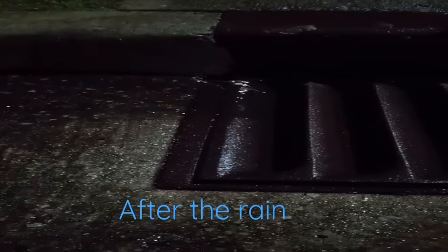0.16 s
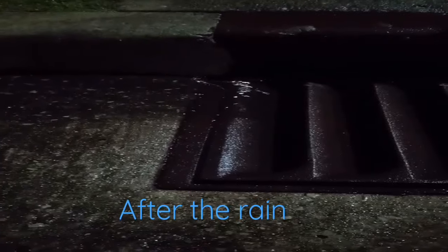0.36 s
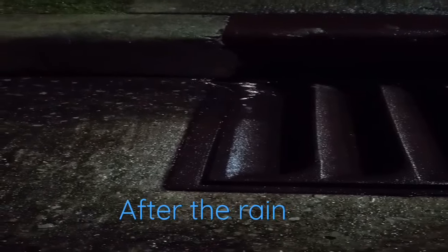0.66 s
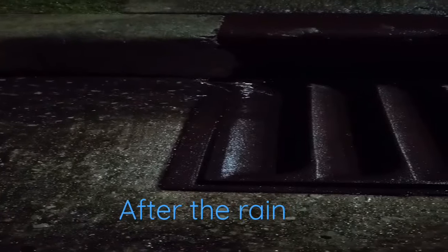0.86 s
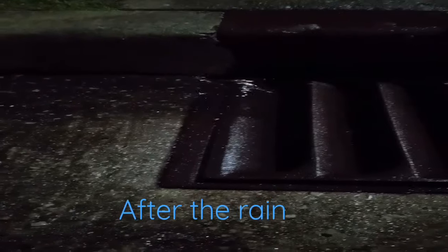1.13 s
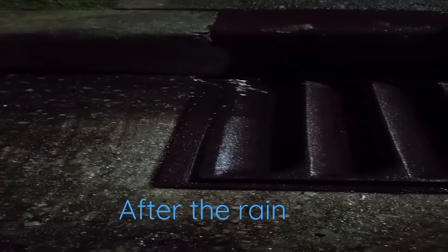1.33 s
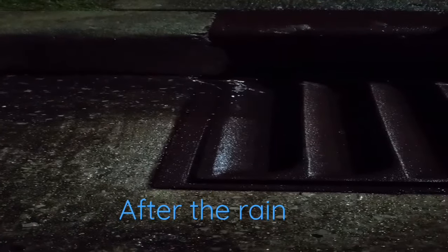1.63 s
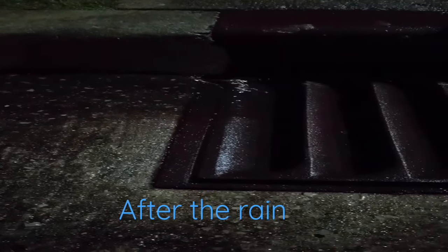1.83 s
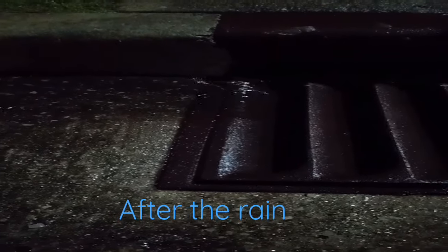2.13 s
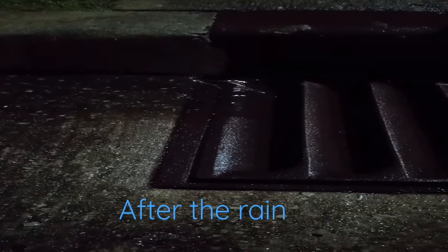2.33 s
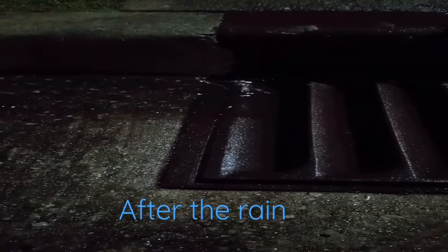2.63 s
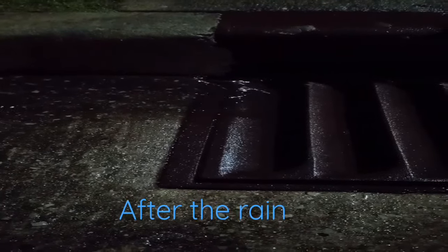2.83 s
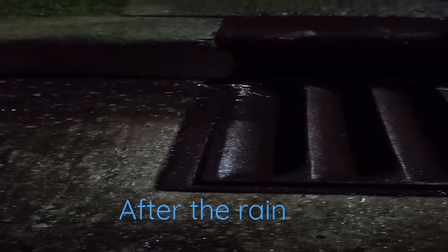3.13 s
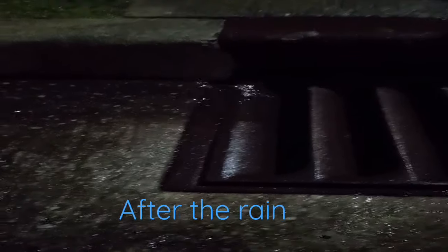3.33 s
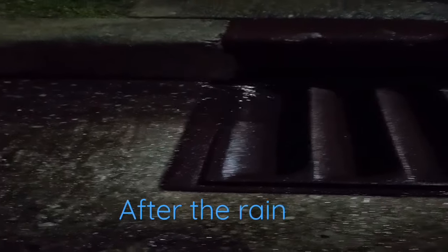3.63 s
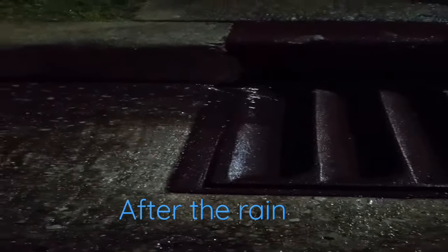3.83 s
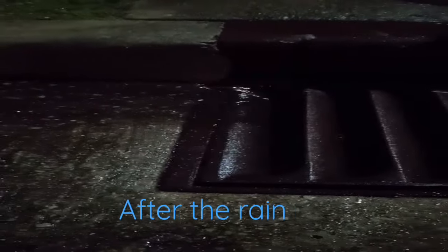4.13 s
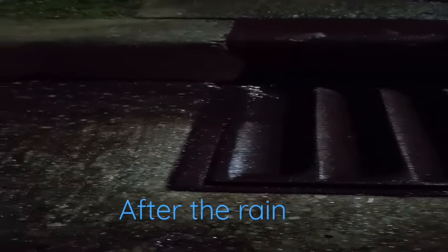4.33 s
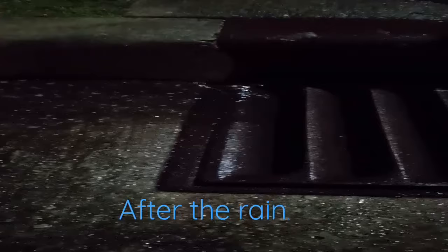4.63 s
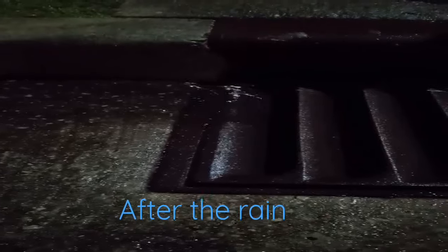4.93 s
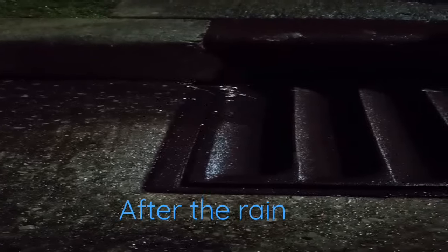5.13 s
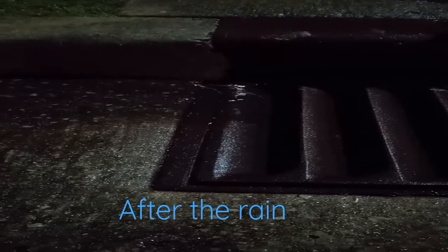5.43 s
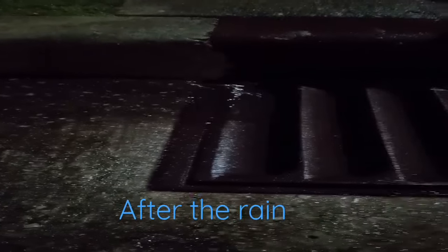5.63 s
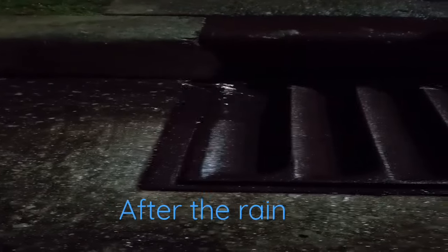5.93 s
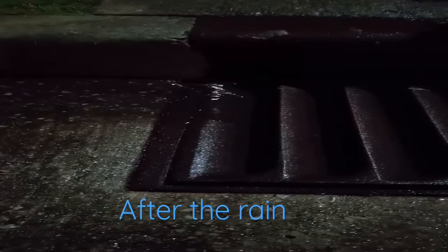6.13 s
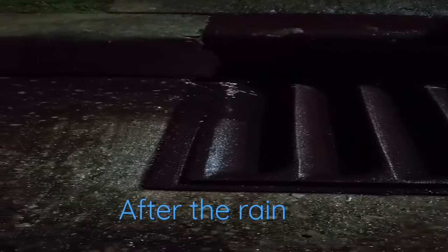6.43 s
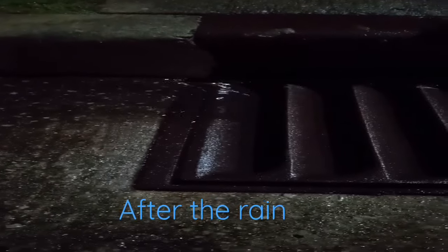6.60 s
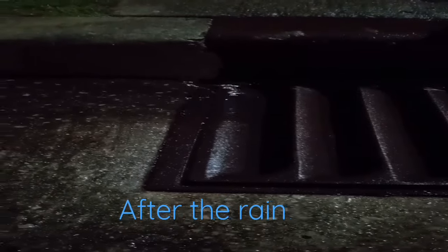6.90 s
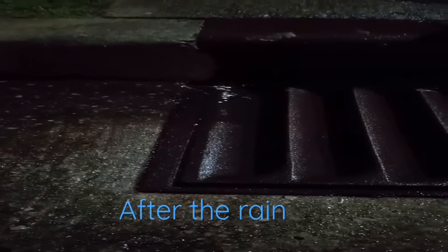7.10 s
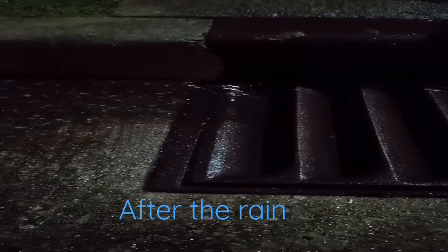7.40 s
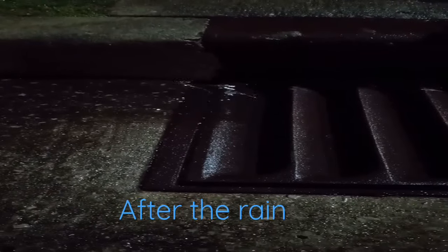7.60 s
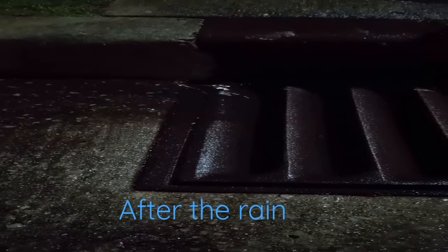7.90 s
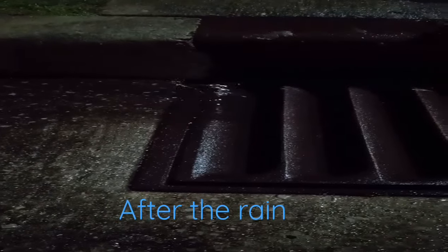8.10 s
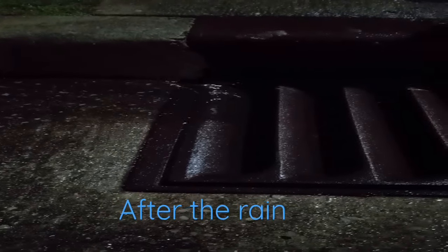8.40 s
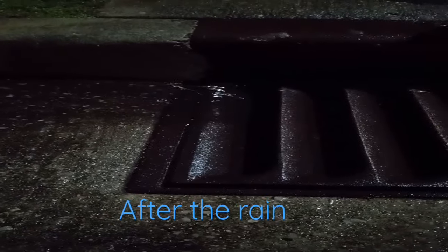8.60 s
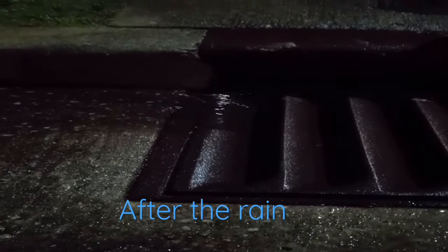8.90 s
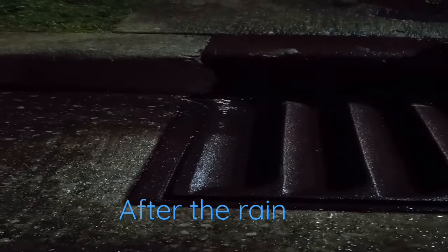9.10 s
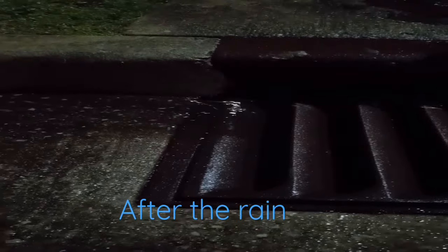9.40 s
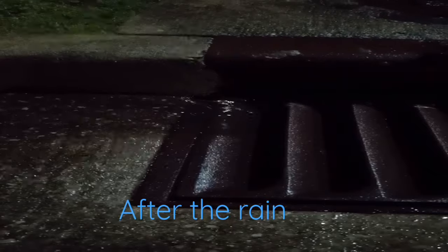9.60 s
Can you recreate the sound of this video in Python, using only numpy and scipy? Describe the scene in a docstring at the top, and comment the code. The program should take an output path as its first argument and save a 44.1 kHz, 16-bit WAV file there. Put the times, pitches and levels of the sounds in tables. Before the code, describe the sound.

Rainwater runs in a thin stream off a kerb and through an iron grate into a concrete drain. Bright ticking droplets, ringing bubbles and small plops overlap constantly, swelling in irregular gurgles. A few sharper smacks stand out. The short hollow echo of the shaft surrounds the water, with faint low rumble and hiss behind. Close stereo microphone; the brightest spray leans right.

```python
"""A thin stream runs off the kerb after rain, through an iron grate into a concrete storm drain.
It is a crowd of ringing bubbles and ticking spray that flickers in spurts and gurgles up in gushes.
Drops patter and plop into the pool below: filtered echo splashes with a bubble note, some with a sharp smack.
Distant town rumble, a wavering low boom of the shaft, traffic wash and fine hiss are shaped noise.
A few soft low bumps, mostly on the left, are decaying sines."""
import sys
import numpy as np
from scipy import signal
from scipy.fft import rfft, irfft, next_fast_len
from scipy.io import wavfile
from scipy.ndimage import uniform_filter1d

SR = 44100
rng = np.random.default_rng(int(sys.argv[2]) if len(sys.argv) > 2 else 0)


def to_wav(sig):
    """Store sig (one row per channel, or 1-D mono) as 16-bit WAV at the path in sys.argv[1].

    Samples outside -1..1 are clipped; the rate is SR.
    """
    pcm = np.clip(np.atleast_2d(sig), -1, 1) * 32767
    pcm = np.round(pcm).astype(np.int16)
    wavfile.write(sys.argv[1], SR, pcm.T)  # frames by channels


N = 429975
BUBBLE_RISE = 0.0384   # share by which a bubble's pitch rises while its ring falls to 1/e


def from_db(db):
    """Decibels to an amplitude factor."""
    return 10 ** (np.asarray(db) / 20)


def rms_one(x):
    """Scale to an rms of 1."""
    return x / np.sqrt(np.mean(x ** 2) + 1e-20)


def at_hz(points, hz):
    """Read a spectrum on a log-frequency axis."""
    f, value = np.transpose(points)
    return np.interp(np.log(np.maximum(hz, 1)), np.log(f), value)


def band(x, low, high):
    """Butterworth band-pass."""
    sos = signal.butter(2, [low, min(high, SR / 2 - 1000)], "band", fs=SR, output="sos")
    return signal.sosfilt(sos, x)


def resonate(x, hz, width):
    """One resonance, gain 1 on top, width in Hz."""
    r = np.exp(-np.pi * width / SR)
    zeros = np.array([1, 0, -1]) * (1 - r * r) / 2
    return signal.lfilter(zeros, [1, -2 * r * np.cos(2 * np.pi * hz / SR), r * r], x)


def pan(db):
    """Left and right gains of constant power for a left-right difference in dB."""
    gains = from_db(np.array([[.5], [-.5]]) * db)
    return gains / np.sqrt(np.mean(gains ** 2, axis=0))


def two_mics(pair, hz):
    """A common and an opposed signal become left and right, more alike in the bass."""
    # left-right likeness: f/Hz, correlation [-1 to 1]
    likeness = [(30, 0.83), (60, 1), (130, 0.91), (290, 0.88), (640, 0.48), (1410, 0.48), (2300, 0.59),
                (3100, 0), (15000, 0)]
    alike = np.clip(at_hz(likeness, hz), -.99, .99)
    return np.sqrt(1 + alike) * pair[0] + np.sqrt(1 - alike) * pair[1] * np.array([[1], [-1]])


def coloured(pair, spectrum):
    """Give a pair of signals a colour and a place; rms 1."""
    # stereo place, mostly to the right in the treble: f/Hz, left-right level/dB
    balance = [(30, 2), (60, -1.5), (110, 1), (700, 0.5), (1500, -3.5), (2500, 1.5), (3700, -0.5),
               (5300, -8), (7300, -9), (9500, -2.5), (11500, -12), (13000, -4), (15000, -16)]
    size = next_fast_len(N)
    hz = np.arange(size // 2 + 1) * SR / size
    placed = two_mics(rfft(pair, size), hz) * pan(at_hz(balance, hz))
    return rms_one(irfft(placed * from_db(at_hz(spectrum, hz)), size)[:, :N])


def drift(corner_hz):
    """Slow chance with spread 1: noise through a two-pole low-pass, drawn every 100 samples."""
    r = np.exp(-200 * np.pi * corner_hz / SR)
    slow = signal.lfilter([1], [1, -2 * r, r * r], rng.standard_normal(N // 100 + 1002))[1000:]
    return np.interp(np.arange(N) / 100, np.arange(len(slow)), rms_one(slow - slow.mean()))


def echoes(t60, direct_db, build_s):
    """One impact in the shaft: the direct path, then single wall reflections that thicken and die away."""
    first_per_s, thicken_s = 800, .014
    t = np.arange(SR // 5) / SR
    chance = np.minimum(first_per_s * (1 + t / thicken_s) ** 2 / SR, 1)
    hits = rng.random((2, len(t))) < chance
    walls = hits * rng.choice([-1, 1], (2, len(t))) / np.sqrt(chance)
    walls = walls * from_db(-60 * t / t60) * (1 - np.exp(-t / build_s))
    walls /= np.sqrt(np.sum(walls ** 2, axis=1, keepdims=True))
    walls[0, 0] += from_db(direct_db + 3)   # the direct path is in the common signal only
    return walls


def bubble(hz, q):
    """A trapped bubble rings and rises in pitch as it nears the surface; energy 1."""
    decay_s = q / (np.pi * hz)
    age = np.arange(int(6 * decay_s * SR) + 2) / SR / decay_s
    ring = np.exp(-age) * np.sin(2 * q * age * (1 + BUBBLE_RISE * age / 2))
    return ring / np.sqrt(np.sum(ring ** 2))


def bubbles(spectrum, range_hz, per_s, spread_db, q, t60, direct_db, build_s, count=14):
    """Separate bubbles, each of its own pitch and strength, ring at a number of spots in the shaft."""
    out, (low, high) = 0, range_hz
    for _ in range(count):
        spot = np.zeros(N + SR)
        for when, pitch, size, damping in rng.random((int(per_s * N / SR / count), 4)):
            hz = low * (high / low) ** pitch
            ring = bubble(hz, q * 2 ** (2 * damping - 1))
            strength = np.sqrt(hz) * from_db(spread_db * min(-np.log(size), 2.5))
            at = int(when * N)
            spot[at:at + len(ring)] += ring * strength
        out = out + signal.oaconvolve(spot[None, :N], echoes(t60, direct_db, build_s), axes=1)[:, :N]
    return coloured(out, spectrum)


def gush_lift(hz):
    """Lift in dB that the gushes give to bubbles of one pitch."""
    # the stream gathers and lets go, stirring up large bubbles: t/s, bubble f/Hz, gurgle lift level/dB
    gushes = [(.47, 1300, 13.5), (.76, 1000, 10.5), (.93, 900, 3), (1.15, 1050, 8), (1.39, 1050, 13),
              (1.53, 1100, 5.5), (1.73, 1400, 7.5), (1.95, 1200, 5), (2.26, 1500, 12), (3.0, 1390, 12),
              (3.46, 1700, 8), (3.98, 1300, 10), (4.22, 1800, 3.5), (4.66, 1610, 11), (5.06, 1300, 7),
              (5.42, 1500, 13), (5.62, 1400, 8.5), (6.0, 1300, 7), (6.8, 1000, 6), (6.93, 1400, 10),
              (7.09, 1400, 12.5), (7.3, 1300, 3), (7.43, 1600, 8.5), (7.75, 1400, 9), (8.0, 1300, 8.5),
              (8.25, 1700, 7), (8.48, 1200, 3), (9.2, 1400, 2), (9.68, 1600, 8.5)]
    half_s, spread_octaves = 0.06, 1.3   # distances at which the lift in dB falls to 1/e
    t = np.arange(0, N, 100) / SR
    lift = 0
    for s, pitch, db in gushes:
        off_pitch = np.log2(hz / pitch) / spread_octaves
        lift = lift + db * np.exp(-((t - s) / half_s) ** 2 - off_pitch ** 2)
    return np.interp(np.arange(N) / SR, t, lift)


def gushing(gurgle):
    """Each size of bubble swells with the gushes near its pitch."""
    # centres of the bubble sizes, crossfaded between neighbours: f/Hz
    sizes_hz = (800, 1300, 2000, 3000)
    size = next_fast_len(N)
    spectrum, hz = rfft(gurgle, size), np.arange(size // 2 + 1) * SR / size
    out = 0
    for pitch, share in zip(sizes_hz, np.eye(len(sizes_hz))):
        part = irfft(spectrum * np.interp(hz, sizes_hz, share), size)[:, :N]
        out = out + from_db(gush_lift(pitch)) * part
    return out


def impacts(per_s, spread_db, count=20000):
    """Random clicks of uneven size."""
    when, chance, size, side = rng.random((count, 4)).T
    heard, clicks = chance < per_s * N / SR / count, np.zeros(N)
    strength = from_db(spread_db * np.minimum(-np.log(size), 3)) * np.sign(side - .5)
    clicks[(when[heard] * N).astype(int)] = strength[heard]
    return clicks


def fine_spray(per_s, spread_db, t60):
    """Tiny droplets of three sizes tick on wet iron and concrete, each with a short wash of reflections."""
    # colour of the spray: f/Hz, level/dB
    spray_colour = [(4000, 9.5), (7000, 6), (9000, 0.5), (11500, 5), (12300, 0), (13300, 1), (14000, -2),
                    (14800, 16), (16000, -1)]
    out, r = 0, from_db(-120 / (t60 * SR))   # per-sample decay of the energy
    # the smallest droplets are the crispest
    for low, high, direct_db in [(4000, 10000, -6), (9500, 13800, -1), (13300, 17000, 3)]:
        clicks = impacts(per_s, spread_db)
        energy = signal.lfilter([1 - r], [1, -r], clicks ** 2 + 1e-18)
        direct = np.array([np.roll(clicks, 12), clicks])   # the direct tick comes 12 samples later in the common signal than in the opposed one
        ticks = np.sqrt(energy) * rng.standard_normal((2, N)) + from_db(direct_db) * direct
        out = out + band(rms_one(ticks), low, high)
    return coloured(out, spray_colour)


def stream():
    """The falling stream: gurgle of large bubbles, patter of small ones, crackle of spray, all in spurts."""
    # colour of the large bubbles: f/Hz, level/dB
    gurgle_colour = [(450, 4), (800, -4.5), (1300, -4), (2000, 1), (2800, 6.5), (4000, -8)]
    # colour of the small bubbles: f/Hz, level/dB
    patter_colour = [(1500, -9.5), (2400, -8), (3200, 0), (4500, -5.5), (6200, 3), (7300, 0), (8500, -17),
                     (12000, -22)]
    spurt_hz, share = 15, 0.38   # flicker corner; share of its power common to all sizes
    spurts = drift(spurt_hz)
    large, small, fine = (np.sqrt(share) * spurts + np.sqrt(1 - share) * drift(spurt_hz) for _ in range(3))
    gurgle = bubbles(gurgle_colour, (650, 3100), per_s=120, spread_db=1.3, q=31.8, t60=0.2,
                     direct_db=-9, build_s=0.0041)
    patter = bubbles(patter_colour, (2400, 8000), per_s=170, spread_db=2.0, q=47, t60=0.25,
                     direct_db=-7.5, build_s=0.0032)
    spray = fine_spray(per_s=260, spread_db=4.0, t60=0.13)
    # level in dB, and how far it swings with a spurt
    trickle = from_db(-61 + 2.1 * large) * gushing(gurgle) + from_db(-48 + 1.5 * small) * patter
    return trickle, from_db(-44.5 + 1.42 * fine) * spray


def boom():
    """The shaft's lowest air mode: a wavering drone without long gaps, with smooth swells."""
    # swells of the boom: t/s, peak level/dB over which the steady drone adds in power
    swell_list = [(.3, -49), (.69, -50), (1.56, -48.5), (1.71, -52), (2.32, -47.5), (2.75, -51.5),
                  (3.32, -50), (4.29, -54), (4.78, -48.5), (4.89, -49), (5.97, -54), (7.27, -44),
                  (7.49, -44.5), (7.69, -50), (7.83, -46), (9.24, -42), (9.6, -51)]
    mode_hz, drone_db, half_s = 158.6, -60.5, 0.037   # half_s: a swell's amplitude is halved this far off
    t = np.arange(N) / SR
    drone = resonate(resonate(rng.standard_normal(N), mode_hz, 16), mode_hz, 30)
    # partly even out the wavering
    drone = rms_one(drone / (uniform_filter1d(drone ** 2, SR // 12) + 1e-12) ** .35)
    swells = sum((from_db(db) / (1 + ((t - s) / half_s) ** 2)) ** 2 for s, db in swell_list)
    return drone * np.sqrt(from_db(drone_db) ** 2 + swells)


def background():
    """Distant town rumble and traffic wash as drifting noise, the air modes of the shaft, steady fine hiss."""
    # course of the town rumble before its trim: t/s, level/dB
    town = [(0.0, -64), (0.16, -54), (0.32, -62), (0.38, -49), (0.46, -56.5), (0.97, -60.5), (1.95, -58.5),
            (2.15, -51.5), (2.17, -65), (2.36, -56), (3.12, -63), (3.17, -57), (3.56, -63.5), (3.83, -50.5),
            (3.94, -65), (5.02, -56), (5.05, -60), (6.0, -62), (6.03, -70), (6.11, -57.5), (6.65, -63),
            (6.71, -51), (6.87, -62.5), (7.55, -55), (7.76, -64), (7.79, -53.5), (7.98, -66), (8.04, -56.5),
            (8.17, -67), (8.36, -55), (8.99, -68), (9.04, -55), (9.12, -68), (9.2, -54), (9.29, -65),
            (9.4, -53), (9.5, -64), (9.61, -56), (9.67, -75), (9.75, -60)]
    # colour of the town rumble: f/Hz, level/dB
    rumble_colour = [(22, -29), (35, -32), (55, -12.5), (85, 4), (120, 0), (170, -5.5), (260, -15.5),
                     (400, -26)]
    # colour of the fine hiss: f/Hz, level/dB
    hiss_colour = [(2000, -37), (5000, -4.5), (9000, -7.5), (15000, -14)]
    # colour of the distant traffic wash: f/Hz, level/dB
    air_colour = [(120, -13.5), (220, -0.5), (350, -5), (600, -7), (1000, -15.5), (2000, -52), (5000, -56)]
    s, db = np.transpose(town)
    town_db = np.interp(np.arange(N) / SR, s, db) + 3.5
    # quick unevenness: swing in dB, corner in Hz
    rumble = from_db(town_db + 2.0 * drift(7.6)) * coloured(rng.standard_normal((2, N)), rumble_colour)
    hiss = from_db(-51) * coloured(rng.standard_normal((2, N)), hiss_colour)
    air = from_db(-62 + 2 * drift(20)) * coloured(rng.standard_normal((2, N)), air_colour)
    # higher air modes
    overtones = sum(resonate(rumble + air, hz, width=14.0) for hz in (202, 238.0, 278.0, 355))
    return rumble + boom() + air + hiss + from_db(-7.5) * overtones


def drops():
    """Each drop smacks the pool and traps a bubble that rings for a few cycles."""
    # drops that stand out of the stream:
    # t/s, bubble f/Hz, splash width [octaves], level/dB before trim, left-right level/dB
    drop_list = [(0.0171, 2200, 0.58, -39.5, -7), (0.017, 3450, 0.71, -37.5, -7),
                 (0.026, 2760, 0.33, -35, 3), (.109, 2230, .15, -57, 3), (.184, 1360, 0.23, -56.5, -5),
                 (0.214, 2530, 0.23, -53.5, -4), (0.298, 6150, 0.16, -45, -13),
                 (0.406, 6340, 0.3, -46, -10), (.409, 2250, 0.18, -52, -7), (.456, 1190, 0.56, -50, -2),
                 (0.523, 977, 0.27, -53.5, 0), (0.594, 5800, 0.91, -43, -7), (0.691, 5900, 0.36, -49, -8),
                 (.722, 817, 0.12, -60, -3), (.727, 5660, 0.81, -40, -13), (.876, 8000, 0.55, -38, -7),
                 (.893, 850, 0.21, -58.5, -1), (0.935, 2960, 0.59, -45, -5), (1.12, 6400, 0.55, -41, -9),
                 (1.124, 2230, .15, -50, -9), (1.138, 1154, 0.2, -50.5, -2), (1.176, 7500, .25, -45, -8),
                 (1.221, 5600, .5, -48, -8), (1.275, 1930, 0.2, -63, -1), (1.361, 2970, 0.2, -45.5, -4),
                 (1.395, 4750, 0.38, -39.5, -8), (1.407, 5100, 0.33, -40.5, -8),
                 (1.497, 5560, 0.32, -36.5, -8), (1.539, 5500, 0.46, -39.5, -8),
                 (1.607, 830, 0.4, -51.5, -2), (1.618, 4550, 1.5, -40.5, -5),
                 (1.715, 3020, 0.58, -41.5, -3), (1.807, 5230, 0.41, -41.5, -8),
                 (1.901, 1750, 0.41, -55.5, -4), (1.711, 2330, 0.21, -63, -2), (1.924, 5800, 0.32, -45, -9),
                 (2.117, 960, 0.49, -59.5, -4), (2.205, 2650, 0.36, -49, -1), (2.092, 4800, 0.22, -41, -10),
                 (2.087, 3170, 0.57, -45, 1), (2.212, 4800, 1.1, -39.5, -11), (2.225, 1120, 0.48, -59, 2),
                 (2.254, 1930, 0.63, -50, -3), (2.39, 1270, 0.13, -55, -4), (2.4637, 3300, 0.27, -33, -1),
                 (2.464, 4190, .15, -35.5, -4), (2.468, 5400, 0.18, -37.5, -10),
                 (2.496, 5360, 0.18, -47, -11), (2.586, 1760, 0.17, -56.5, -3), (2.644, 2040, .28, -60, -5),
                 (2.684, 3140, 0.63, -50, -2), (2.738, 5260, 0.73, -42, -13), (2.733, 826, 0.49, -60.5, 7),
                 (2.832, 950, 0.35, -60, -1), (2.858, 4930, 0.37, -38.5, -9), (2.888, 2200, .18, -54.5, -1),
                 (2.949, 3240, 0.51, -44.5, -4), (2.966, 2240, .2, -61, -4), (2.997, 2200, 1.3, -52, -3),
                 (3.035, 1220, 0.48, -60, -5), (3.073, 3200, 0.38, -47.5, 4), (3.174, 3660, 0.44, -41.5, 2),
                 (3.341, 1890, 0.26, -55.5, 1), (3.445, 2350, 0.25, -57, 0), (3.51, 3460, 0.71, -44, 0),
                 (3.544, 2040, 0.4, -54, 0), (3.543, 3670, 0.9, -41.5, -3), (3.61, 5030, 0.67, -39, -6),
                 (3.612, 1940, 0.23, -58, -3), (3.673, 1500, 0.5, -47.5, -1), (3.68, 1120, 0.26, -59, -3),
                 (3.736, 1450, 0.53, -51, -3), (3.75, 2050, 0.44, -50.5, -5), (3.774, 1490, 0.18, -62, -3),
                 (3.883, 5660, 0.4, -51, -7), (3.921, 1656, 0.16, -54, -4), (3.93, 2590, .2, -52, 1),
                 (3.943, 830, 0.47, -57.5, 2), (3.986, 1680, 0.13, -61, -3), (3.966, 5360, 0.75, -38, -9),
                 (3.985, 3730, 0.21, -44, -3), (4.003, 3820, 0.83, -39, -4), (4.075, 6070, 0.24, -41, -16),
                 (4.11, 5200, 2.2, -42, -9), (4.297, 6200, .3, -47, -12), (4.301, 2100, .2, -58, -4),
                 (4.309, 4830, 0.87, -41, -3), (4.642, 5400, 0.67, -38.5, -10),
                 (4.668, 1460, 0.29, -57, -4), (4.704, 1900, 0.37, -56, -8), (4.994, 1740, 0.31, -55, -2),
                 (5.054, 810, 0.14, -61, -3), (5.026, 4720, .15, -45, -7), (5.055, 2640, 0.63, -47, -6),
                 (5.062, 5140, 0.61, -38, -6), (5.256, 5300, .6, -43.5, -8), (5.34, 5970, .3, -45, -8),
                 (5.38, 5950, .2, -43.5, -8), (5.408, 4000, 0.7, -43.5, -4), (5.422, 1900, 0.12, -53.5, -7),
                 (5.437, 2560, .15, -59, -3), (5.564, 6230, 0.17, -37, -10), (5.57, 3300, .25, -45.5, -2),
                 (5.605, 1710, 0.68, -51, -5), (5.602, 2780, 0.17, -42, 1), (5.682, 4730, 0.13, -47, -6),
                 (5.789, 5500, 0.47, -39.5, -7), (5.79, 3500, 0.24, -52, 0), (5.933, 2920, 0.27, -47.5, 1),
                 (6.055, 5100, 1.2, -41.5, -4), (6.19, 830, 0.24, -65, 2), (6.293, 5950, 0.27, -44, -12),
                 (6.353, 5500, 0.77, -38.5, -6), (6.537, 3370, 0.72, -40.5, -2),
                 (6.632, 4570, 0.91, -39, -9), (6.748, 5500, .55, -41, -4), (6.771, 1080, 1.2, -56, 0),
                 (6.776, 2430, 1.2, -48, 1), (6.773, 5900, .5, -50, -8), (6.83, 2130, 0.33, -58, -1),
                 (6.915, 2570, .3, -54, -3), (6.925, 1410, 0.38, -59, -3), (6.9, 2040, 0.55, -53.5, -1),
                 (6.941, 1875, .15, -54, -4), (7.041, 2040, 0.94, -50, 0), (7.0855, 4740, 0.29, -35.5, -5),
                 (7.104, 1210, 0.75, -60, -4), (7.267, 1590, 0.82, -55, -3), (7.294, 6070, 0.46, -39, -10),
                 (7.425, 2100, 0.26, -61, -4), (7.488, 6400, 0.46, -36.5, -8),
                 (7.641, 6170, 0.19, -40, -14), (7.708, 6100, 0.39, -42, -11), (7.669, 1270, 1.2, -50, 0),
                 (7.729, 1420, 0.57, -60, 7), (7.829, 660, 0.38, -53.5, 0), (7.858, 527, 0.36, -59, -5),
                 (7.934, 2180, .15, -55, -10), (7.979, 2150, .18, -57, -10), (8.189, 1950, .5, -55.5, 1),
                 (8.19, 6500, 0.22, -38, -8), (8.252, 1740, 0.59, -53, -6), (8.25, 5630, 0.46, -38, -3),
                 (8.252, 3030, 0.47, -54, -7), (8.412, 824, 0.12, -58.5, 1), (8.455, 2970, 0.22, -48, 7),
                 (8.462, 4370, 0.17, -47, -5), (8.584, 2350, 0.22, -53, -1), (8.585, 2980, 0.27, -54, -4),
                 (8.339, 5700, 0.51, -43, -9), (8.45, 2390, 0.24, -51, 4), (8.449, 860, 1.7, -55, -5),
                 (8.462, 5000, 0.71, -40, -9), (8.511, 1330, 0.18, -52, -8), (8.58, 4040, 0.27, -43, -5),
                 (8.715, 3720, 1.8, -46, 0), (8.845, 820, 0.26, -66, -1), (8.855, 6200, .3, -43.5, -11),
                 (9.012, 3630, 0.17, -42, -3), (9.147, 1520, 0.74, -56.5, -2),
                 (9.233, 3660, 0.2, -44.5, -4), (9.245, 1200, 0.55, -55, -3), (9.44, 1650, 0.29, -58, 5),
                 (9.456, 4700, 0.42, -43, -14), (9.616, 4550, 1.6, -43, -12), (9.731, 1200, 1.1, -54, -4)]
    trim_db, smack_db, note_db, note_q = -9, -12, -2.5, 49   # smack and note are relative to the splash
    t60, direct_db, build_cycles = 0.17, -10.5, 6.1   # echo length in s, direct path over echo, echo swell
    out = np.zeros((2, N + SR))
    for s, hz, octaves, db, side_db in drop_list:
        heard = two_mics(echoes(t60, direct_db, build_s=build_cycles / hz), hz)
        half = 2 ** (max(octaves, .12) / 2)
        splash = band(heard, hz / half, hz * half)
        splash = rms_one(band(splash, hz / half / 1.05, hz * half * 2))
        smack = band(heard, hz * .85, hz * 1.8)
        smack = rms_one(band(smack, hz * .85, hz * 1.8))
        ring = bubble(hz * (1 - BUBBLE_RISE / 2), note_q)
        note = rms_one(signal.fftconvolve(splash, ring[None], axes=1)[:, :splash.shape[1]])
        # wide splashes ring less
        plop = rms_one(splash + from_db(smack_db) * smack + from_db(note_db) / half ** 4 * note)
        at = max(round(s * SR), 0)
        out[:, at:at + plop.shape[1]] += plop * from_db(db + trim_db) * pan(side_db)
    return out[:, :N]


def shaft(water):
    """Standing waves between the walls lift narrow bands, differently at each side, and hollow out others."""
    # standing waves at the left microphone: f/Hz, width [Hz], lift level/dB
    left_modes = [(816.5, 17.5, 12.5), (1112, 24, 9), (1166, 22, 10), (1245, 38, 11), (1380, 92, 7),
                  (1616, 19, 7.5), (1728, 18, 10.5), (1730, 37, 3.5), (1889, 31, 14.5), (2770, 22, 2.5),
                  (3050, 39, -13), (4040, 87, 7), (4670, 68, 9.5), (5820, 19, 14)]
    # standing waves at the right microphone: f/Hz, width [Hz], lift level/dB
    right_modes = [(807, 22, 8.5), (1072, 18, 7), (1148, 22, 7), (1420, 70, 6), (1726, 30, 6),
                   (1904, 28, 6), (2223, 110, 6), (2600, 120, 3), (2926, 45, 8), (3072, 50, 8.5),
                   (3337, 32, 4), (3468, 35, 4), (3620, 50, 4), (4102, 35, 4), (4220, 60, 5), (4320, 50, 4),
                   (4749, 55, 4), (4920, 45, 4), (5217, 80, 3), (6229, 45, 7)]
    # bands shared by both sides, mostly cancelling between the walls: f/Hz, width [Hz], lift level/dB
    hollows = [(1040, 120, 0), (1283, 48, -7), (1566, 28, -22), (2250, 86, 1.5), (2410, 110, -4),
               (4090, 110, -21.5)]
    sides = []
    for x, modes in zip(water, (left_modes, right_modes)):
        change = sum((from_db(db) - 1) * resonate(x, hz, width) for hz, width, db in modes + hollows)
        sides.append(x + change)
    return from_db(-0.5) * np.array(sides)


def smacks():
    """Drops on wet iron in the open: a few cycles that swell and die within milliseconds."""
    # sharp smacks: t/s, f/Hz at the peak, level/dB before trim and panning, left-right level/dB
    smack_list = [(.0175, 2470, -27.5, -2), (.877, 7900, -33, -9), (1.12, 6500, -33, -8),
                  (1.497, 5440, -34, -8), (2.4647, 3250, -21.5, 0), (2.479, 3350, -27, -3),
                  (2.4887, 3500, -31, -3), (3.967, 5400, -29, -8), (5.5626, 6200, -27, -8),
                  (6.748, 5500, -31, -6), (7.0862, 4640, -30.5, -6), (7.489, 5960, -27, -10),
                  (7.641, 6150, -27, -12), (8.19, 6460, -26, -8), (8.251, 5550, -33, -2),
                  (8.584, 4000, -34, -5)]
    peak_cycles, trim_db = 4.8, -1.2   # cycles until a smack peaks; overall trim
    out, t = np.zeros((2, N + SR)), np.arange(SR // 50) / SR
    for s, hz, db, side_db in smack_list:
        age, at = t * hz / peak_cycles, int(s * SR)
        tick = age * np.exp(1 - age) * np.sin(2 * np.pi * hz * t * (1 + BUBBLE_RISE * (age / 2 - 1)))
        pair = np.array([np.roll(tick, 1), tick])   # the right microphone is nearer
        out[:, at:at + len(t)] += pair * from_db(db + trim_db) * pan(side_db)
    return out[:, :N]


def bumps():
    """Soft low thuds, mostly on the left: sines with a soft onset and an exponential decay."""
    # thuds: t/s, f/Hz, t60 [s], level/dB before onset and panning
    bump_list = [(0.135, 70, 0.25, -41), (0.365, 62, 0.2, -32), (.435, 240, .12, -42.5),
                 (.13, 228, 0.18, -49)]
    out = np.zeros(N)
    for s, hz, t60, db in bump_list:
        t = np.maximum(np.arange(N) / SR - s, 0)
        level = from_db(db - 60 * np.minimum(t / t60, 5)) * (1 - np.exp(-t / .008))
        out += level * np.sin(2 * np.pi * hz * t)
    return out * pan(db=27)


def scene():
    """Stream and drops colour in the shaft; smacks, spray, background and bumps reach the microphones as is."""
    trickle, spray = stream()
    return shaft(trickle + drops()) + smacks() + spray + background() + bumps()


def record(dry):
    """The top is cut steeply above 15550 Hz."""
    return signal.sosfilt(signal.ellip(12, .1, 80, 15550, fs=SR, output="sos"), dry)


dry = scene()
out = record(dry)
to_wav(out)
```